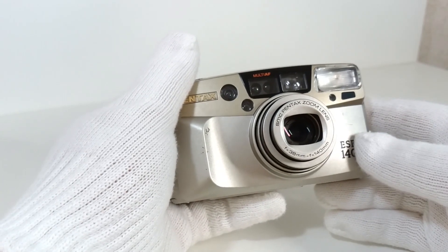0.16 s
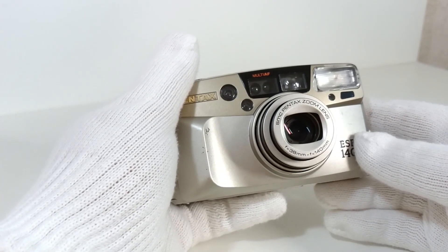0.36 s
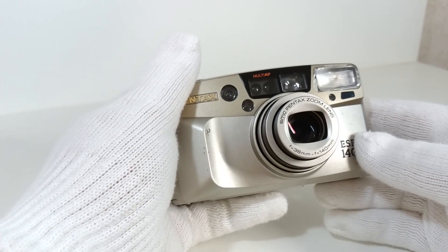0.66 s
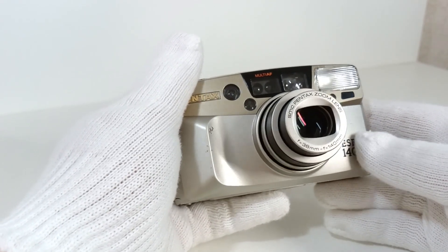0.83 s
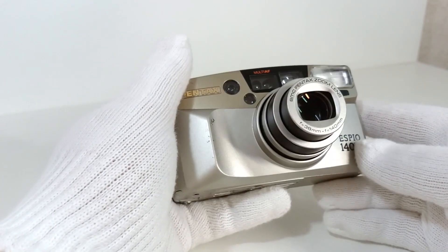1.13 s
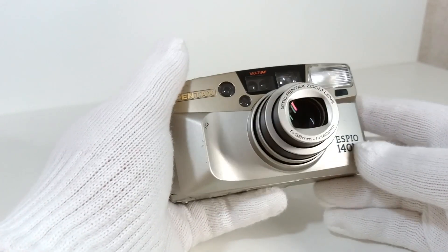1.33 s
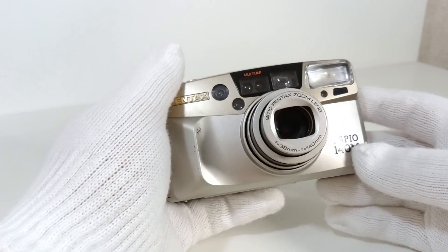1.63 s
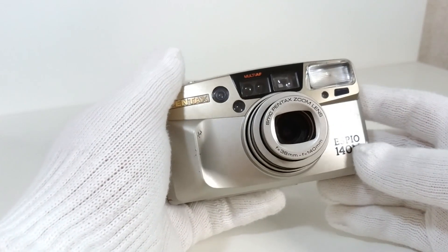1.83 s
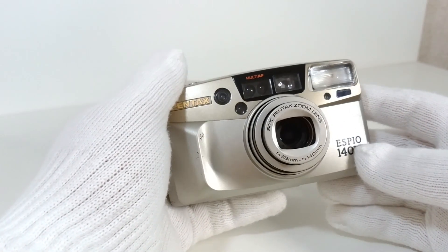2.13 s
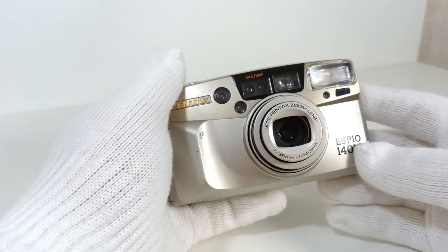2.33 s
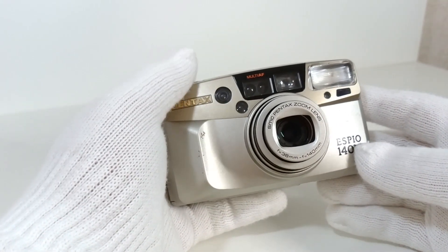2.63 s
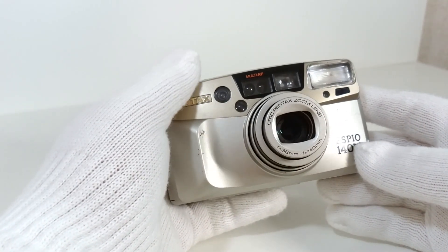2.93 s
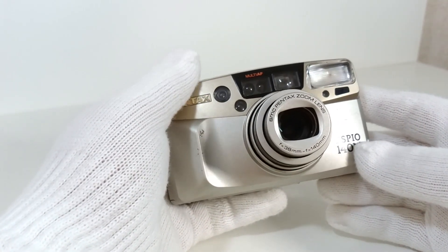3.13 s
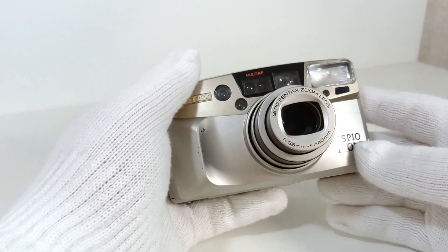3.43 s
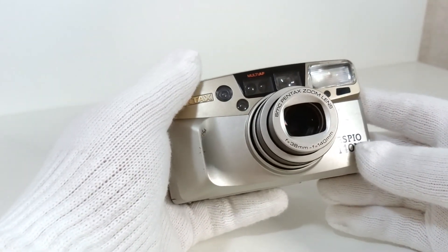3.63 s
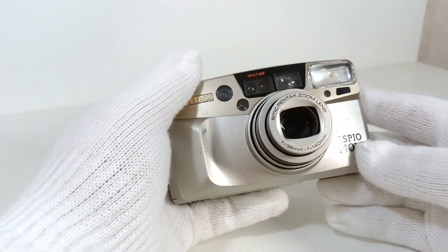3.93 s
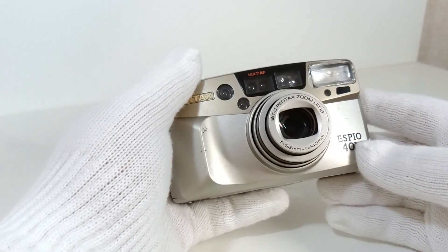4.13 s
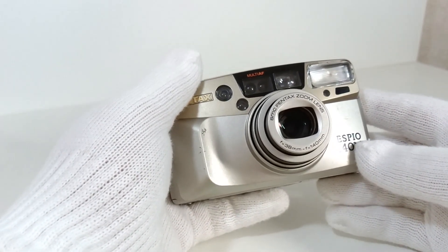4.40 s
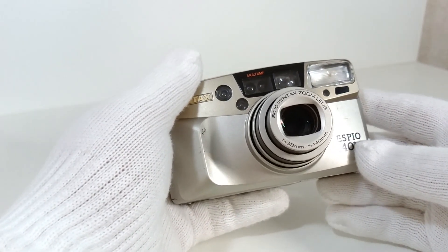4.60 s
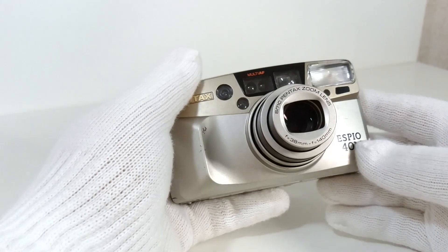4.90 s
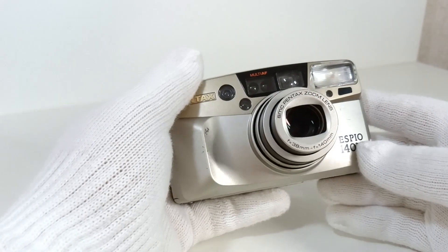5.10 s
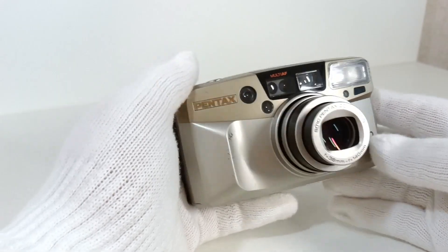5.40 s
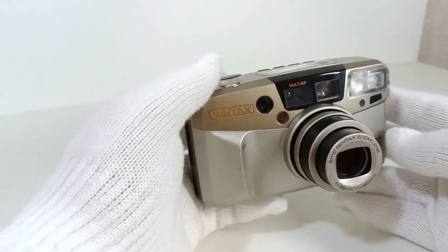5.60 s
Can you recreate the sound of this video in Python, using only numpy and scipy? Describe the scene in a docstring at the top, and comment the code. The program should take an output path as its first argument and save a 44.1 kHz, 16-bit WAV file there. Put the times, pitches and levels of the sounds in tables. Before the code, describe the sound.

In a small room, gloved hands handle a compact camera right by the microphone. After a soft brush and a switch click, the lens motor whirs in nine quick bursts, its gears whining and rattling, slightly higher when retracting. A second sharp click lands about two thirds of the way through. Behind it are a faint rising engine hum from outside early on, soft low handling booms and quiet room noise.

```python
"""A small room, the microphone close to a compact camera held in gloved hands.
The lens zooms out and in, nine short runs: a small motor spins up, whines through its gears and brakes
with a rattle, and each retraction ends with a short push forward. Gloves brush the shell and a switch
clicks. Farther off, outside, a vehicle speeds up and hums through the room. Soft low booms come from
handling, the vehicle and the room's bass resonances."""
import sys
import numpy as np
from scipy import signal
from scipy.fft import rfft, irfft
from scipy.io import wavfile
from scipy.ndimage import map_coordinates

SR = 44100
rng = np.random.default_rng(int(sys.argv[2]) if len(sys.argv) > 2 else 0)


def transcribe(signal):
    """Save signal, clipped to [-1, 1], as a 16-bit WAV file at the path in sys.argv[1]."""
    frames = np.atleast_2d(signal).T
    limited = np.clip(frames, -1, 1)
    pcm = np.round(limited * 32767).astype(np.int16)
    wavfile.write(sys.argv[1], SR, pcm)


N = 253771
TIME = np.arange(N) / SR
FREQS = np.fft.rfftfreq(N, 1 / SR)


def amp(db):
    """Decibels to gain."""
    return 10 ** (np.asarray(db) / 20)


def unit(x):
    """Scales to rms 1."""
    return x / np.sqrt(np.mean(x ** 2) + 1e-20)


def read(points, hz):
    """Reads a table of (Hz, value) on a log-frequency axis."""
    f, value = np.transpose(points)
    return np.interp(np.log(hz + 1), np.log(f + 1), value)


def coloured(x, gain):
    """Filters x by a gain over FREQS, to rms 1."""
    return unit(irfft(rfft(x) * gain, N))


def noise(spectrum):
    """Noise of rms 1 shaped by a table of (Hz, dB)."""
    return coloured(rng.standard_normal(N), amp(read(spectrum, FREQS)))


def drift(t, rate_hz):
    """Smooth random wander of rms about 1 at the times t."""
    knots = rng.standard_normal(int(np.ceil(8 * rate_hz + 4)))
    return map_coordinates(knots, [t * rate_hz], order=2, mode="nearest")


def bell(offset, width):
    """A bell curve, width across where it has fallen to 1/e."""
    return np.exp(-(2 * offset / width) ** 2)


def envelope(t, attack_s, hold_s, fade_db_per_s):
    """Rises evenly from t = 0, stays full until hold_s, then fades."""
    return np.clip(t / attack_s, 0, 1) * amp(-fade_db_per_s * np.maximum(t - hold_s, 0))


def bursts(rows, spectrum, rise_s, hold_s, t60_s):
    """Noise bursts, one per (s, dB) row, that swell, hold and die away."""
    level = np.zeros(N)
    t = TIME[:SR // 2]
    for start, db in rows:
        shape = amp(db - 60 * np.maximum(t - hold_s, 0) / t60_s) * (1 - np.exp(-t / rise_s))
        part = level[round(start * SR):][:len(t)]
        part += shape[:len(part)]
    return level * noise(spectrum)


# The quiet room around the microphone. Each row: frequency in Hz, relative level in dB.
ROOM_TONE_SPECTRUM = [(20, -22), (40, -23.5), (57, 6.5), (72, -7.5), (88, -2), (101, -1.5), (118, -7.5),
                      (200, -15.5), (400, -21.5), (1000, -31), (2500, -39.5), (5000, -53), (10000, -57.5),
                      (15000, -51)]

def room_tone(level_db=-51, waver_db=2.46):
    """The room's own low noise, wavering in level."""
    return amp(level_db + waver_db * drift(TIME, 6)) * noise(ROOM_TONE_SPECTRUM)


# The engine outside. Each entry: a multiple of its fundamental.
ENGINE_MULTIPLES = [1, 1.5, 2, 2.5, 3, 3.5]
# The room's bass resonances. Each row: centre in Hz, width in Hz, level an order reaches there in dB.
BASS_MODES = [(57.85, 7.7, -30.5), (63.76, 2.75, -39), (77.9, 2.64, -36.5), (93.6, 24, -51.5),
              (140, 16, -56), (174, 19, -55.5), (244, 10, -61)]

def engine(idle_hz=55.3, pull_away_s=0.26, rise_hz_per_s=10.4, between_modes_db=-65):
    """A distant engine idles, speeds up and fades; its orders boom as they cross the room's modes."""
    hz = idle_hz + rise_hz_per_s * np.maximum(TIME - pull_away_s, 0)
    turns = np.cumsum(hz) / SR
    load = amp(-11.5 * np.maximum(1 - TIME / 1.3, 0))  # overtones come up as it takes load
    out = np.zeros(N)
    for k in ENGINE_MULTIPLES:
        boom = amp(between_modes_db) + sum(amp(db) * bell(k * hz - f, w) for f, w, db in BASS_MODES)
        strength = (load if k > 1 else 1) * amp(0.9 * drift(TIME, 8.82))
        out += np.sqrt(2) * boom * strength * np.sin(2 * np.pi * (k * turns + rng.random()))
    return out * envelope(TIME, attack_s=0.11, hold_s=2.38, fade_db_per_s=48)


# The road, heard from indoors. Each row: peak time in seconds, level in dB, length in seconds.
TYRE_SWELLS = [(0.593, -58, .55), (1.515, -50, 1.78), (5.003, -56.5, 0.48)]
# Tyres at that distance. Each row: frequency in Hz, relative level in dB.
TYRE_SPECTRUM = [(110, 1), (190, -4), (344, -4), (406, -2), (438, -9), (600, -9.5), (807, -13.5),
                 (1600, -17.5), (2900, -26), (4370, -37.5), (6570, -35.5), (16000, -59)]

def tyres(steady_db=-70.5):
    """Tyre noise swells and ebbs over a faint steady bed."""
    level = amp(steady_db) + sum(amp(db) * bell(TIME - s, length) for s, db, length in TYRE_SWELLS)
    level *= envelope(TIME, attack_s=0.44, hold_s=5.1, fade_db_per_s=26)
    return level * amp(1.1 * drift(TIME, 30)) * noise(TYRE_SPECTRUM)


# Gloves, close to the microphone. Each row: start in seconds, level in dB.
GLOVE_STROKES = [(.032, -55.5), (3.548, -63), (4.445, -57), (5.525, -56), (5.635, -74)]
# Their dull rustle. Each row: frequency in Hz, relative level in dB.
GLOVE_SPECTRUM = [(100, 2), (400, -1.5), (1200, -8.5), (3000, -20), (6000, -45), (16000, -39)]

def gloves():
    """Cotton gloves brush the camera's shell."""
    return bursts(GLOVE_STROKES, GLOVE_SPECTRUM, rise_s=0.002, hold_s=0.0055, t60_s=0.29)


# Switch and latch, close up. Each row: start in seconds, level in dB.
SWITCH_CLICKS = [(.305, -67), (0.314, -37.5), (.489, -62.5), (1.604, -56), (4.1615, -33), (4.418, -52)]
# The ring of a click. Each row: frequency in Hz, relative level in dB.
CLICK_SPECTRUM = [(290, -40.5), (500, 0), (604, -23), (750, -10), (1060, -17), (1400, 4.5), (2230, -9),
                  (3440, 4.5), (4030, -7), (6510, -6.5), (11600, -21.5), (14000, -20), (16000, -29)]

def clicks(reversal_delay_s=0.0042, reversal_db=-50):
    """Small plastic and metal parts snap; the gears click to their other flank as the motor reverses."""
    reversals = [(run[0] + reversal_delay_s, reversal_db)
                 for before, run in zip(ZOOM_RUNS, ZOOM_RUNS[1:]) if run[2] != before[2]]
    snaps = list(SWITCH_CLICKS) + reversals
    return bursts(snaps, CLICK_SPECTRUM, rise_s=0.00062, hold_s=0.00083, t60_s=0.053)


# The camera body's resonances, close up. Each row: centre in Hz, width in Hz, relative level in dB.
BODY_MODES = [(797, 81, 5), (1343, 190, 3), (1987, 180, -1.5), (2687, 52, 1.5), (3104, 263, 3.5),
              (3820, 52, -3), (4235, 110, -1.5), (4950, 116, -5), (5710, 37, -1), (6763, 245, -7),
              (8350, 650, -18), (13500, 5000, -82)]

def body_gain(hz):
    """The body's response: the summed power of its resonances, with little bass radiated."""
    power = sum(amp(db) ** 2 / (1 + (2 * (hz - f) / width) ** 2) for f, width, db in BODY_MODES)
    return np.sqrt(power / (1 + (560 / (hz + 1)) ** 6))


def gear_rattle(knocks_per_s=5000):
    """Unloaded teeth knock about in their play and ring the body."""
    knocks = (rng.random(N) < knocks_per_s / SR) * rng.choice([-1, 1], N)
    return coloured(knocks * rng.uniform(0.5, 1.5, N), body_gain(FREQS))


def gear_chatter(t, turns, orders, rough_hz=150):
    """Loose teeth strike around the mesh rates, given as (shaft multiple, dB): rough chirps."""
    out = np.zeros(len(t))
    for k, db in orders:
        roughness = drift(t, rough_hz) + 1j * drift(t, rough_hz)
        out += amp(db) * (roughness * np.exp(2j * np.pi * k * turns)).real
    return unit(out)


def motor_shaft(t, powered_s, hz, spin_up_s, stop_s=0.07):
    """The shaft climbs, cruises unevenly and brakes; returns its speed (0 to 1) and turns made."""
    speed = (1 - np.exp(-t / spin_up_s)) * np.clip(1 - (t - powered_s) / stop_s, 0, 1)
    waver = 1 + 0.0012 * drift(t, 25) + 0.0018 * drift(t, 260)
    return speed, np.cumsum(hz * speed * waver) / SR


# The two tooth flanks, close up, extending and retracting.
# Each row: multiple of the shaft speed (fractions are later gear meshes), relative level in dB.
EXTEND_ORDERS = [(1, 0), (2, 1), (3, -11), (4, -10), (5, 1.5), (6, -4), (7, -12), (8, -5.5), (8.375, -13),
                 (9, -7), (10, -9), (10.23, -6.5), (11, -12), (12, -12), (13, -19), (14, -12), (15, -18),
                 (17, -1), (18, -17), (19, -20), (21, -23), (22, -15), (23, -25), (24, -23), (25, -24),
                 (29, -27), (35, -28), (36, -29)]
RETRACT_ORDERS = [(1, -7), (2, -8), (3, 8), (4, -8), (5, -10), (6, -10.5), (7, -12.5), (8, -4.5),
                  (9, -10.5), (10, -13), (11, -13), (12, -17), (13, -14), (14, -18), (15, -19), (16, -19),
                  (17, -18), (18, -25), (19, -29), (20, -28), (21, -28), (22, -23), (23, -36), (24, -29)]
# The highest retracting orders. Each row: frequency in Hz, relative level in dB.
RETRACT_FIZZ = [(10700, -37), (11200, -40), (12000, -34), (12900, -37), (13700, -34), (15500, -42)]

def gear_whine(t, speed, turns, cruise_hz, way):
    """Shaft orders sweep through the body's resonances, rasping most before the teeth are seated."""
    if way == "in":
        fizz = [(k, read(RETRACT_FIZZ, k * cruise_hz)) for k in range(25, 37)]
        orders, level_db, steepness = list(RETRACT_ORDERS) + fizz, -34, 0.55
    else:
        orders, level_db, steepness = EXTEND_ORDERS, -42, 1.1
    out = np.zeros(len(t))
    for k, db in orders:
        sweep = body_gain(k * cruise_hz * speed) / body_gain(k * cruise_hz)
        seating = speed ** (0.68 + steepness * k)  # only fast, seated teeth excite the high orders
        shimmer = 0.024 * k * (drift(t, 23.9) + 1j * drift(t, 20.3))  # load varies as the barrel turns
        rasp_depth = (k / 38) ** 2 + 0.3 * np.sqrt(1 - speed)
        rasp = rasp_depth * (drift(t, 236.6) + 1j * drift(t, 240))
        tone = np.exp(2j * np.pi * (k * turns + rng.random()))
        out += amp(db) * sweep * seating * ((1 + shimmer + rasp) * tone).real
    steady_rms = np.sqrt(sum(amp(db) ** 2 for _, db in orders) / 2)
    return amp(level_db) * out / steady_rms


# Gears and barrel sliding, extending and retracting. Each row: frequency in Hz, relative level in dB.
EXTEND_HISS = [(200, -18), (600, -4), (1400, -4), (2400, -2), (3200, 0), (4100, 3), (5200, -3), (5800, 3),
               (6300, -3), (7700, -7), (8600, 0), (10500, -12), (14500, -11), (16000, -19)]
RETRACT_HISS = [(200, -16), (600, 0), (1300, 2), (2300, -4), (3300, 1), (4100, 4), (5100, -3), (5800, 2),
                (6300, -6), (6800, 4), (7700, -6), (11500, -12), (14000, -7), (16000, -16)]
# The lens, close to the microphone. Each row: start in seconds, brake time in seconds, direction,
# cruising shaft speed in Hz, spin-up in seconds, final sag in Hz, start and brake rattle gains in dB.
ZOOM_RUNS = [(0.596, 0.885, "out", 394.3, 0.026, 0, -41.5, -40),
             (2.007, 2.39, "in", 430.8, .026, 9, -37.5, -38.5),
             (2.448, 2.576, "out", 397.5, .021, 1, -40.5, -38.5),
             (2.899, 3.385, "out", 395.5, 0.026, 0, -42, -38.5),
             (3.71, 4.173, "in", 428.6, .024, 1.5, -38, -40),
             (4.227, 4.357, "out", 395.2, .02, -1, -41, -38.5),
             (4.523, 4.794, "out", 398, .027, 2, -41, -41),
             (5.046, 5.262, "in", 433.4, 0.026, 3.5, -37.5, -38),
             (5.318, 5.448, "out", 396.3, 0.02, -0.5, -40.5, -37.5)]

def zoom_motor(sag_s=0.0364, stir_s=0.004):
    """Each run: rattle as the slack is taken up, whine and sliding hiss, then rattle under the brake."""
    out = np.zeros(N)
    rattle = gear_rattle()
    sliding = {"out": amp(-53.8) * noise(EXTEND_HISS), "in": amp(-58.5) * noise(RETRACT_HISS)}
    for on, off, way, cruise_hz, spin_up_s, sag_hz, start_db, brake_db in ZOOM_RUNS:
        span = slice(round(on * SR), round((off + 0.22) * SR))
        t = TIME[span] - TIME[span][0]
        since_brake = t - (off - on)
        # the load builds over the last stretch of travel
        loaded_hz = cruise_hz - sag_hz * np.exp(np.minimum(since_brake, 0) / sag_s)
        speed, turns = motor_shaft(t, off - on, loaded_hz, spin_up_s)
        whine = gear_whine(t, speed, turns, cruise_hz, way)
        since_stir = t + stir_s  # the teeth stir just before the shaft turns
        if way == "in":
            mesh = gear_chatter(t, turns, [(3, 0), (8, -6), (10, -3), (14, -9)])
            chirps = amp(-3) * speed * mesh
            slack = envelope(since_stir, attack_s=0.021, hold_s=0.027, fade_db_per_s=190)
        else:  # pushing the barrel out, the teeth crunch longer before they seat
            mesh = gear_chatter(t, turns, [(4, 0), (5, -2), (6, -7), (7, -10), (9, -5), (10, -4)])
            chirps = amp(1.1) * speed ** 2 * mesh
            slack = envelope(since_stir, attack_s=0.03, hold_s=0.057, fade_db_per_s=380)
        once_a_turn = np.cos(2 * np.pi * turns)
        hiss = sliding[way][span] * speed * (1 + 0.2 * once_a_turn) * amp(0.65 * drift(t, 39.5))
        knocking = rattle[span] * (1 + 0.16 * once_a_turn)
        start_rattle = amp(start_db) * slack * (chirps + 0.82 * knocking)
        driven = np.exp(-np.maximum(since_brake, 0) / 0.015)
        out[span] += driven * (whine + hiss + start_rattle)
        overrun = amp(-9) * speed * gear_chatter(t, turns, [(2, -3), (3, 0)])
        brake = envelope(since_brake + 0.0055, attack_s=0.011, hold_s=0.018, fade_db_per_s=682)
        out[span] += amp(brake_db) * brake * (knocking + overrun)
    return out


# Bass reaching the microphone from near and far.
# Each row: peak time in seconds, pitch in Hz, level in dB, length in seconds.
LOW_SWELLS = [(1.963, 62.1, -43.5, 0.063), (2.073, 63.36, -36.5, 0.028), (2.075, 108.8, -40.5, 0.038),
              (2.423, 60.2, -38, 0.076), (2.696, 101, -45.5, 0.096), (2.892, 112, -44.5, 0.038),
              (3.13, 57.4, -44, 0.091), (3.114, 140, -55, 0.15), (3.405, 57, -47.5, 0.45),
              (4.264, 58.8, -49, 0.29)]

def low_swells():
    """Soft low booms from handling, the vehicle outside and the room's bass resonances, one tone each."""
    out = np.zeros(N)
    for s, hz, db, length in LOW_SWELLS:
        tone = np.sqrt(2) * np.sin(2 * np.pi * (hz * TIME + rng.random()))
        out += amp(db) * bell(TIME - s, length) * tone
    return out


# The room's decay at the microphone. Each row: frequency in Hz, seconds to fall by 60 dB.
ROOM_DECAY = [(200, .35), (1500, .3), (6000, .24), (15000, .2)]

def room_reflections(x, echoes_per_s=2500, first_echo_s=0.004):
    """A small room returns sparse reflections, the treble dying first."""
    n = SR // 2
    taps = rng.choice([-1., 1.], n) * (rng.random(n) < echoes_per_s / SR) * (TIME[:n] > first_echo_s)
    hz, t, spectra = signal.stft(taps, SR, nperseg=256)
    decay = amp(-60 * t / read(ROOM_DECAY, hz)[:, None])
    tail = signal.istft(spectra * decay, SR, nperseg=256)[1]
    return signal.fftconvolve(x, tail / np.linalg.norm(tail))[:N]


def scene(reflections_db=-21):
    """The close camera with a little room, over the distant vehicle; the same in both channels."""
    camera = zoom_motor() + clicks() + gloves()
    room = room_tone() + amp(reflections_db) * room_reflections(camera)
    mono = camera + room + low_swells() + engine() + tyres()
    return np.array([mono, mono])


def record(dry):
    """The recorder's band limit, a steep low-pass at 15.8 kHz."""
    lowpass = signal.firwin(511, 15800, window=("kaiser", 9), fs=SR)
    return signal.oaconvolve(dry, lowpass[None], "same")


dry = scene()
out = record(dry)
transcribe(out)
```